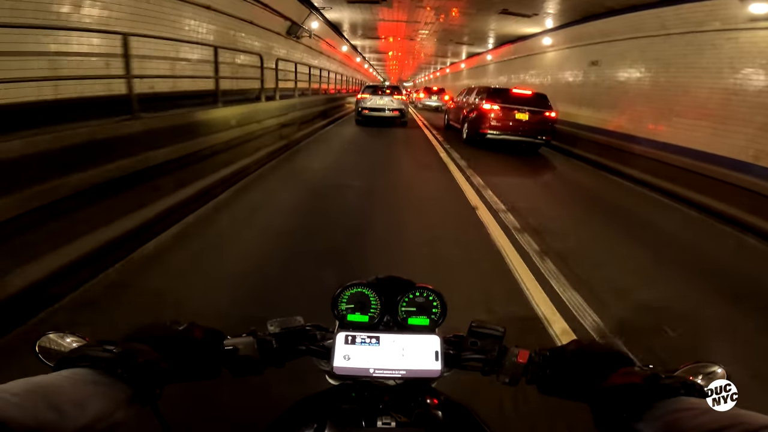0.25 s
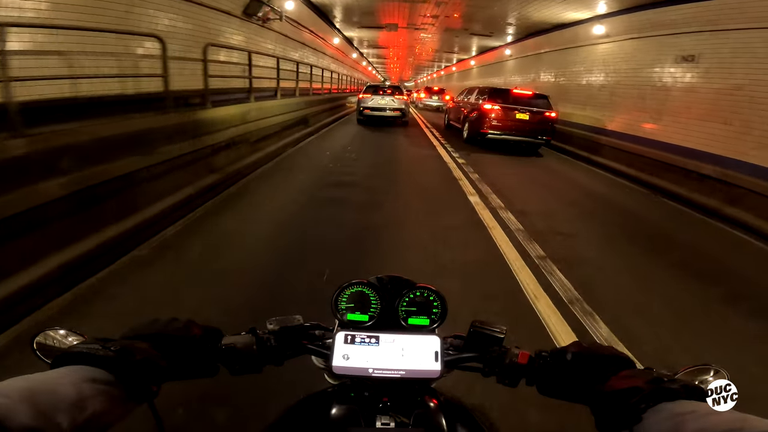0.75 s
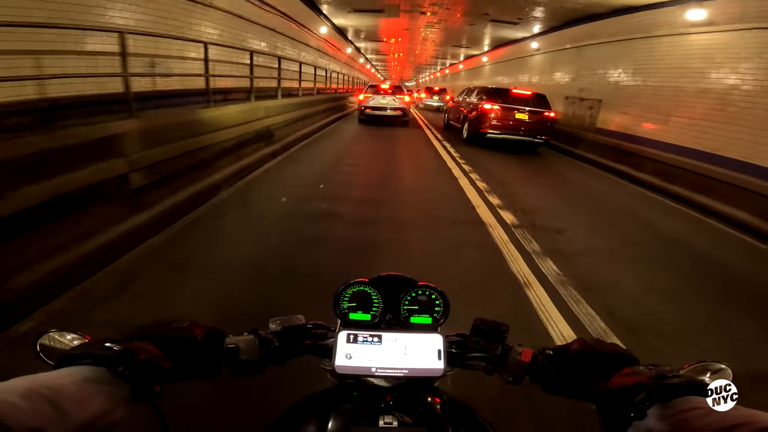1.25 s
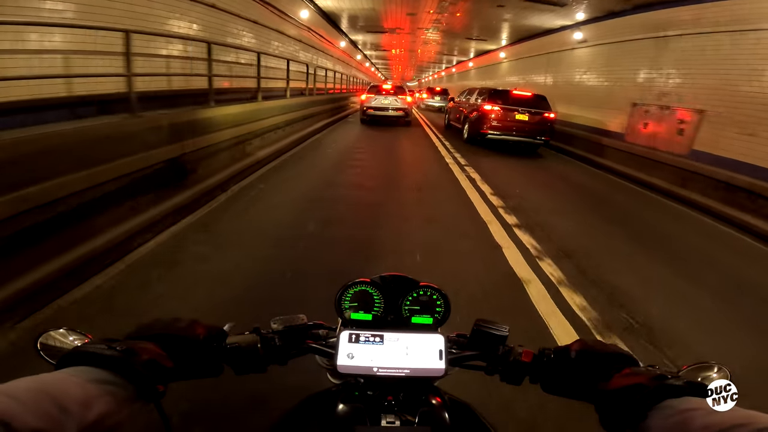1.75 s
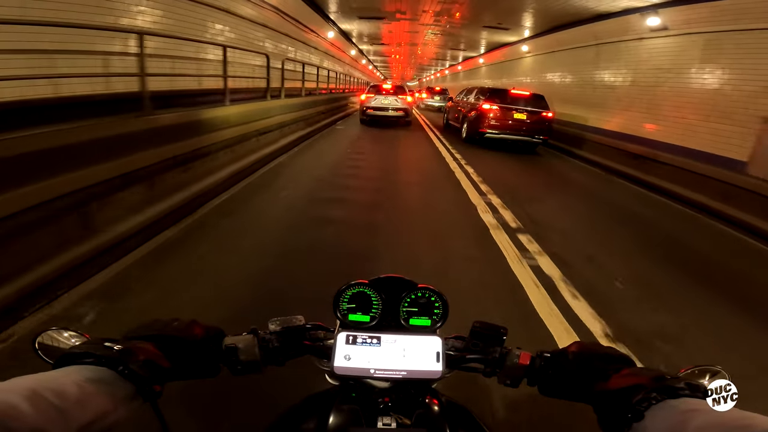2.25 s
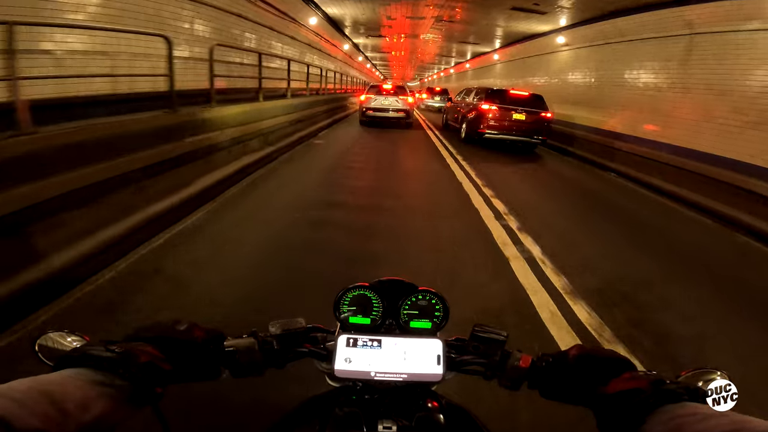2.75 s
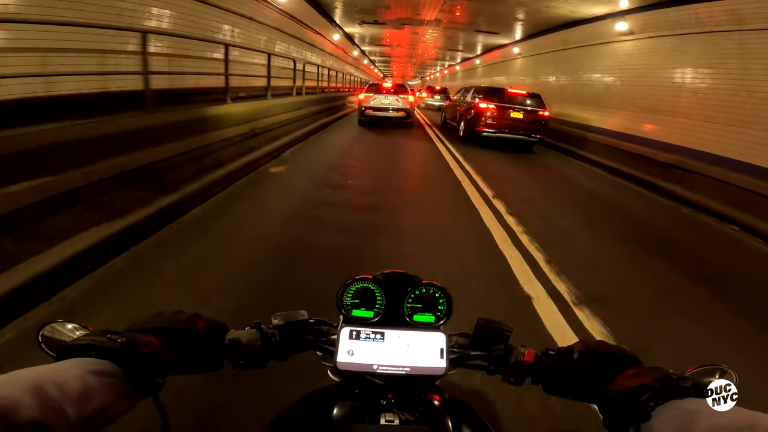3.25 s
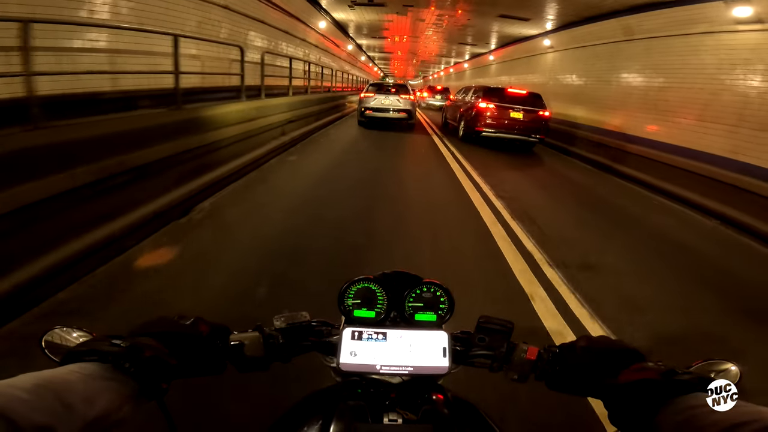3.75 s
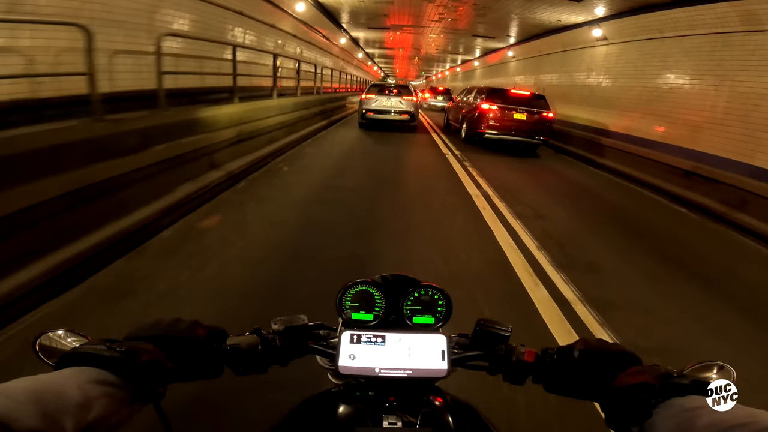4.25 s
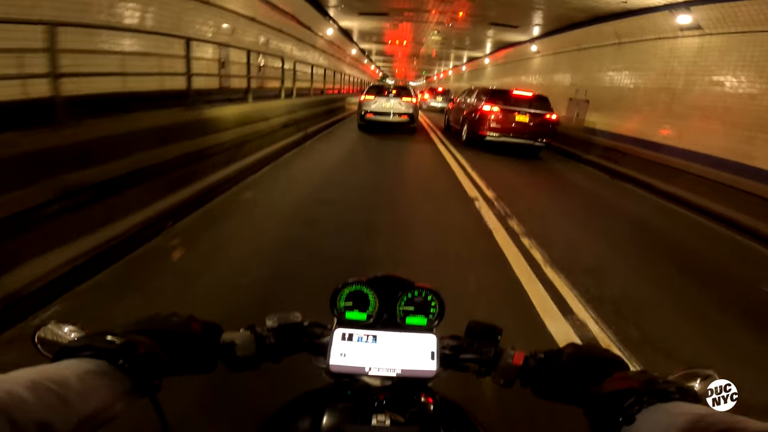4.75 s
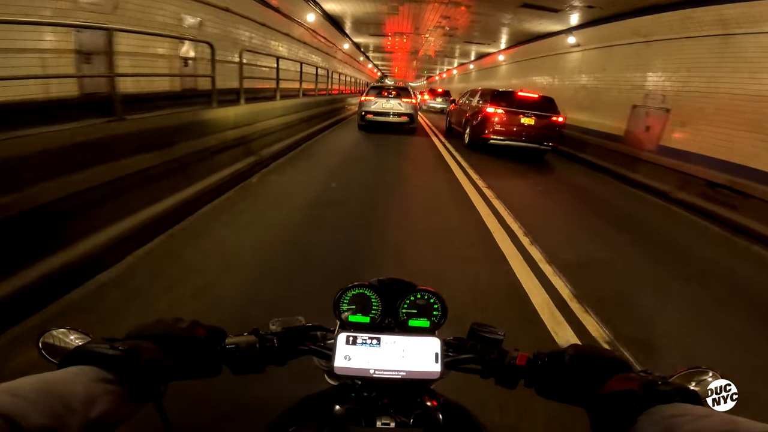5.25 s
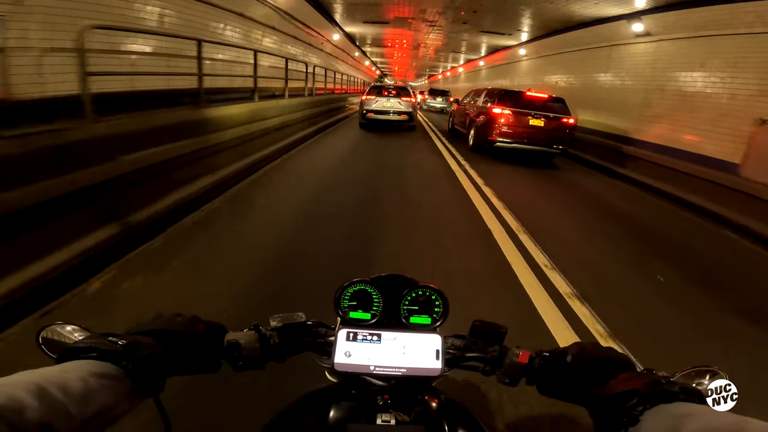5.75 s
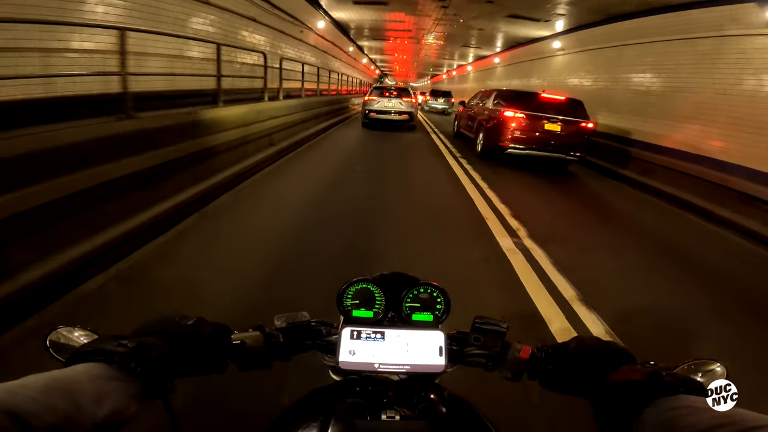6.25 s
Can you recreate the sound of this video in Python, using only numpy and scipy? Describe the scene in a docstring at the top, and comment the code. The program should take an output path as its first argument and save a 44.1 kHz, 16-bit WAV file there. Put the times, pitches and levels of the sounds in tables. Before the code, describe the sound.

A close onboard microphone catches a motorcycle's soft, wavering engine drone in an enclosed tunnel. Dark, continuous tyre and traffic rumble surrounds it, with resonant booms and a nearby car's hum beating against the engine. Treble is only a very faint hiss, with a barely audible thin squeal late on. Finally the engine pulls harder, its pitch climbing modestly to the cut.

```python
"""First comes the wavering hum of a twin-cylinder motorcycle cruising through a tiled road tunnel;
at the end its throttle opens and the hum climbs. Each exhaust order (a whole multiple of the engine
cycle rate) is a shaken sine. More sines make a car's drone, the traffic's booms, a lingering tone,
a thin squeal and a slow pressure heave; shaped noise makes the roar and the hiss."""
import sys
import numpy as np
from scipy import signal
from scipy.io import wavfile
from scipy.ndimage import uniform_filter1d

SR = 44100
rng = np.random.default_rng(int(sys.argv[2]) if len(sys.argv) > 2 else 0)


def pcm_store(signal):
    """Save signal as 16-bit PCM."""
    levels = np.round(np.clip(np.atleast_2d(signal), -1, 1) * 32767)
    wavfile.write(sys.argv[1], SR, levels.astype(np.int16).T)


def amplitude_ratio(level_db):
    """Convert a level in decibels to the matching linear amplitude (field) ratio."""
    exponent = np.asarray(level_db, float) / 20
    return 10 ** exponent


N = 287091
T = np.arange(N) / SR  # time of each sample [s]

# How far the throttle is open: (time [s], opening [0-1])
THROTTLE_OPENING = [(0, 0.02), (5.5, 0.06), (5.85, 0.42), (6.05, 0.6), (6.25, 0.84), (6.51, 0.96)]
# Engine speed, in four-stroke cycles of two crank turns: (time [s], cycles per second [Hz])
CYCLE_RATE = [(0, 19.7), (.3, 19.5), (1.5, 20), (2.4, 20.1), (3.3, 20.05), (4.2, 19.75), (5.3, 19.45),
              (5.8, 19.75), (6, 20.1), (6.18, 20.7), (6.33, 21.5), (6.51, 22.1)]
# Exhaust orders; from the 11th up the levels are relative to the growl:
# (order [multiple of the cycle rate], level with throttle shut [dB], level with it fully open [dB])
ORDER_LEVELS = [(1, -45.5, -37), (2, -28.5, -33), (3, -26, -39.5), (5, -26, -18.5), (6, -29, -16.5),
                (7, -31.5, -35), (9, -45.5, -30), (10, -36, -27.5), (11, -21, -18.5), (12, -10, -8.5),
                (13, -11, -11), (14, -14, -12.5), (15, -15, -10), (16, -10, -16), (17, -14.5, -4),
                (18, -15.5, -10.5), (19, -11.5, -11.5), (20, -18.5, -28), (21, -18.5, -20),
                (22, -22.5, -19)]
# The 4th order throbs unevenly, close in pitch to the car's drone: (time [s], level [dB])
FOURTH_ORDER_LEVEL = [(0, -16.5), (.3, -22), (1.1, -19), (2.2, -29), (2.65, -18.5), (3, -22), (3.7, -25.5),
                      (4.2, -17.5), (5, -21.5), (5.3, -20), (5.9, -28.5), (6.2, -18), (6.51, -20)]
# The 8th and strongest order waxes and wanes as its tunnel echoes interfere: (time [s], level [dB])
EIGHTH_ORDER_LEVEL = [(0.0, -12), (0.09, -26.5), (0.23, -14.5), (0.33, -23), (1.09, -19), (1.25, -27.5),
                      (1.45, -15.5), (1.74, -21), (1.79, -42), (1.94, -17), (2.05, -16), (2.45, -26.5),
                      (2.54, -15.5), (2.74, -26.5), (2.83, -12), (2.92, -25), (3.68, -17.5), (3.83, -39.5),
                      (3.88, -21.5), (4.46, -20.5), (4.73, -28), (4.82, -29), (4.88, -31.5), (5.04, -15),
                      (5.24, -34), (5.39, -16.5), (5.64, -20), (6.22, -14), (6.44, -25.5), (6.51, -19)]
# Growl of the upper exhaust orders, before its random surges: (time [s], level [dB])
GROWL_LEVEL = [(0, -34.5), (1.5, -30.5), (3.7, -30), (5.75, -33.5), (5.85, -26.5), (6.15, -23.5),
               (6.51, -34.5)]
# Tone lingering under the strongest order as the engine climbs: (time [s], pitch [Hz], level [dB])
LINGERING_TONE = [(5.95, 158, -45), (6.15, 158.3, -22), (6.4, 159.6, -27), (6.51, 159.3, -26.5)]
# Drone of a car engine close ahead: (time [s], pitch [Hz], level [dB])
CAR_DRONE = [(0, 86, -22.5), (1.8, 88.45, -23.5), (2.3, 89.36, -18.5), (2.9, 85.57, -40),
             (3.85, 87.33, -16), (4.3, 86.6, -34), (5.6, 85.6, -21.5), (6, 83.2, -26), (6.51, 82.5, -25)]
# Resonances of the traffic drone, before the surges: (pitch [Hz], width [Hz], level [dB])
TRAFFIC_BOOMS = [(128.1, 8.4, -27.5), (247.4, 5.4, -39.5), (331.7, 6.8, -40.5), (462, 7.1, -46.5),
                 (209.5, 8, -46), (307.5, 9.1, -45.5)]
# Spectrum shape of the tyre and engine roar filling the tunnel: (frequency [Hz], relative level [dB per Hz])
ROAR_SPECTRUM = [(14, -16.5), (30, -16.5), (50, -9.5), (75, 0), (105, -0.5), (140, -3.5), (175, -9.5),
                 (225, -21), (330, -17.5), (430, -23), (564, -28), (947, -27), (1190, -33), (2000, -53),
                 (2600, -78)]
# Spectrum shape of the hiss of air, chain and valve gear: (frequency [Hz], relative level [dB per Hz])
HISS_SPECTRUM = [(1060, -19), (1800, -3), (2020, -4.5), (2610, -1), (3150, -7), (3450, -5.5), (4440, -9),
                 (6000, -7.5), (6910, -5.5), (7700, -9.5), (8650, -14), (11200, -13.5), (13700, -27.5),
                 (15800, -31)]
# Drifting level of that hiss, before its crank pulse: (time [s], level [dB])
HISS_LEVEL = [(0.05, -53), (0.19, -53), (4.68, -53), (5.24, -53.5), (6.32, -51), (6.45, -53)]
# Faint thin squeal in the traffic: (time [s], pitch [Hz], level [dB])
SQUEAL_PATH = [(5.22, 10250, -84), (5.29, 10300, -70), (5.36, 10350, -71), (5.44, 10600, -75),
               (5.55, 10850, -78), (5.78, 11100, -77), (5.9, 10900, -88)]
# Slow pressure heave on the microphone: (time [s], level [dB])
HEAVE_LEVEL = [(0, -29), (2.7, -29), (3.5, -18), (4.2, -36), (5.05, -17), (5.3, -28), (5.95, -23),
               (6.51, -50)]

SECOND_FIRING = 270 / 720  # share of the cycle between the two cylinders
CRANK_START = 0.65  # share of the cycle already turned at the start
SURGE_DB, SURGES_PER_S = 2.5, 8.7  # rms depth and rough speed of the surges
# share of scatter: throttle shut and fully open (both scaled by order), and in the 8th order
ROUGH_CRUISE, ROUGH_LOAD, ROUGH_EIGHTH = 0.58, 0.2, 0.2
ROAR_DB = -18.5
BASS_CLEARS_DB, BASS_TOP_HZ = -2.5, 150  # the low roar thins as the throttle opens


def evened(x):
    """Scales a signal to rms 1."""
    return x / np.sqrt(np.mean(abs(x) ** 2) + 1e-20)


def curves(rows):
    """Draws each column of a time table as a curve with one value a sample."""
    times, *columns = np.transpose(rows)
    return [np.interp(T, times, column) for column in columns]


def wobble(hz):
    """Complex noise, smoothed twice so that it wanders about hz times a second."""
    rate = SR // 10  # slow noise needs few points [Hz]
    r = np.exp(-2 * np.pi * hz / rate)
    raw = rng.standard_normal((N // 10 + 1 + rate, 2)) @ [1, 1j]
    smooth = signal.lfilter([1], np.convolve([1, -r], [1, -r]), raw)[rate:]  # drop the settling second
    return evened(np.interp(T * rate, np.arange(len(smooth)), smooth))


def drift_db(depth_db, hz):
    """A random wander in dB about zero."""
    return depth_db * evened(wobble(hz).real)


def tone(hz, rough, wobble_hz, start):
    """A sine of about rms 1, its size and phase shaken by a share of noise; start is in turns."""
    rough = np.clip(rough, 0, 1)
    shake = np.sqrt(1 - rough ** 2) + rough * wobble(wobble_hz)
    turns = np.cumsum(hz) / SR + start
    return np.sqrt(2) * (shake * np.exp(2j * np.pi * turns)).real


def noise(points, patchy_db, swell_db, size):
    """Noise of rms 1 from random short spectra, with drifting patches and one shared swell."""
    frames, hz = 4 * N // size + 5, np.fft.rfftfreq(size, 1 / SR)
    a, b, patches = rng.standard_normal((frames, len(hz), 3)).T
    patches = uniform_filter1d(patches, size=12, axis=0)  # smooth across frequency
    patches = evened(uniform_filter1d(patches, size=10, axis=1))  # then across time
    swell = evened(uniform_filter1d(rng.standard_normal(frames), size=12))
    f, db = np.transpose(points)
    shape_db = np.interp(np.log(hz + 1), np.log(f + 1), db, -120, -120)[:, None]
    spectra = (a + 1j * b) * amplitude_ratio(shape_db + patchy_db * patches + swell_db * swell)
    return evened(signal.istft(spectra, nperseg=size, noverlap=3 * size // 4)[1][:N])


def exhaust(surge_db):
    """Two unevenly spaced firings a cycle make the orders; scatter blurs most of them less under load."""
    cycle_hz = curves(CYCLE_RATE)[0]
    load = curves(THROTTLE_OPENING)[0]
    growl_db = curves(GROWL_LEVEL)[0] + surge_db
    rough = ROUGH_CRUISE + (ROUGH_LOAD - ROUGH_CRUISE) * load
    orders = [(4, curves(FOURTH_ORDER_LEVEL)[0]), (8, curves(EIGHTH_ORDER_LEVEL)[0])]
    for k, cruise_db, load_db in ORDER_LEVELS:
        order_db = cruise_db + load * (load_db - cruise_db)
        orders.append((k, order_db + growl_db * (k > 10)))
    out = np.zeros(N)
    for k, db in orders:
        # phase of the two firings added together, in turns
        pair = np.angle(1 + 1e-9 + np.exp(-2j * np.pi * k * SECOND_FIRING)) / (2 * np.pi)
        # the silencer delays higher orders more, spreading each pulse
        smear = 0.004 * k ** 2
        blur = ROUGH_EIGHTH if k == 8 else rough * (k / 8) ** 0.5
        start = k * CRANK_START + pair - smear
        out -= amplitude_ratio(db) * tone(k * cycle_hz, blur, 4.0, start)
    return out


def linger():
    """A nearly steady tone left hanging in the tunnel: one lightly shaken sine."""
    hz, db = curves(LINGERING_TONE)
    started = T > LINGERING_TONE[0][0]
    return amplitude_ratio(db) * tone(hz, 0.25, 4.0, rng.random()) * started


def car():
    """The engine drone of the car ahead: one sine, wavering in pitch and level."""
    hz, db = curves(CAR_DRONE)
    return amplitude_ratio(db) * tone(hz, 0.35, 3.0, rng.random())


def traffic(surge_db):
    """Broad noise roar with narrow resonant booms that partly share the surges of the growl."""
    booms = np.zeros(N)
    for hz, width, db in TRAFFIC_BOOMS:
        booms += amplitude_ratio(db) * tone(np.full(N, hz), 0.826, width / 2, rng.random())
    roar = amplitude_ratio(ROAR_DB) * noise(ROAR_SPECTRUM, 0.89, 0.16, size=4096)
    low_pass = signal.butter(N=4, Wn=BASS_TOP_HZ, fs=SR, output="sos")
    bass = signal.sosfiltfilt(low_pass, roar)
    bass_removed = 1 - amplitude_ratio(BASS_CLEARS_DB * curves(THROTTLE_OPENING)[0])
    return amplitude_ratio(0.18 * surge_db) * booms + roar - bass_removed * bass


def hiss():
    """Treble noise that pulses faintly with the crank, which turns twice a cycle."""
    crank = 2 * np.pi * 2 * np.cumsum(curves(CYCLE_RATE)[0]) / SR
    level_db = curves(HISS_LEVEL)[0] + 0.27 * np.cos(crank)
    return amplitude_ratio(level_db) * noise(HISS_SPECTRUM, 0.74, 0.2, size=1024)


def squeal():
    """A brief whistle that rises, then dips at its end; fast shaking makes it fuzzy."""
    hz, db = curves(SQUEAL_PATH)
    sounding = (T > SQUEAL_PATH[0][0]) * (T < SQUEAL_PATH[-1][0])
    return amplitude_ratio(db) * tone(hz, 0.95, 90.0, 0) * sounding


def heave():
    """Pressure swings around 8 Hz, below hearing, shaken wholly at random."""
    return amplitude_ratio(curves(HEAVE_LEVEL)[0]) * tone(np.full(N, 8.0), 1.0, 3.0, rng.random())


def scene():
    """Adds every source at one microphone; growl and booms share one set of surges."""
    surge_db = drift_db(SURGE_DB, SURGES_PER_S)
    motorcycle = exhaust(surge_db) + linger()
    background = car() + traffic(surge_db) + hiss() + squeal() + heave()
    return (motorcycle + background)[None]


def roll_off(x):
    """The treble ends steeply here."""
    return signal.sosfilt(signal.butter(12, 15710, fs=SR, output="sos"), x)


def record(dry):
    """Softly squeezes the loudest swings with a tanh curve."""
    ceiling = 1.57
    mix = ceiling * np.tanh(dry / ceiling)
    return roll_off(mix)


dry = scene()
out = record(dry)
pcm_store(out)
```